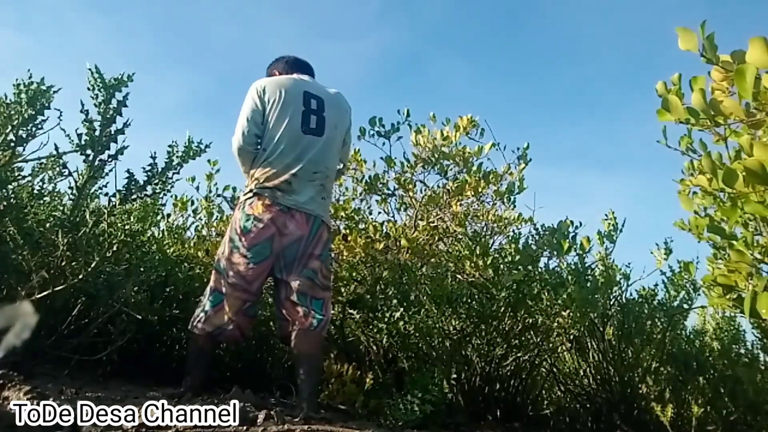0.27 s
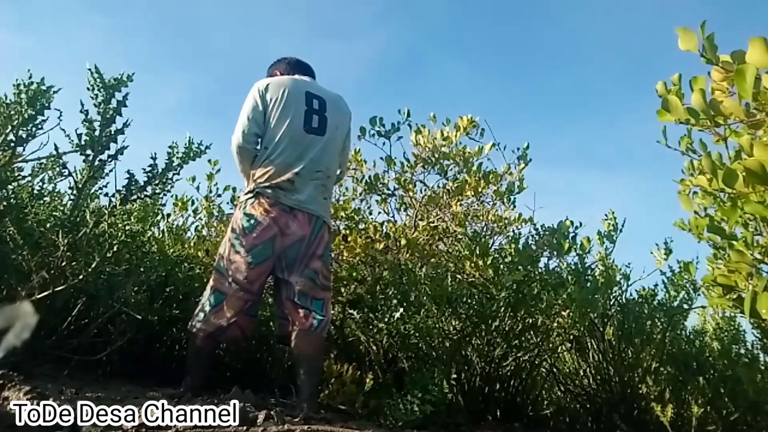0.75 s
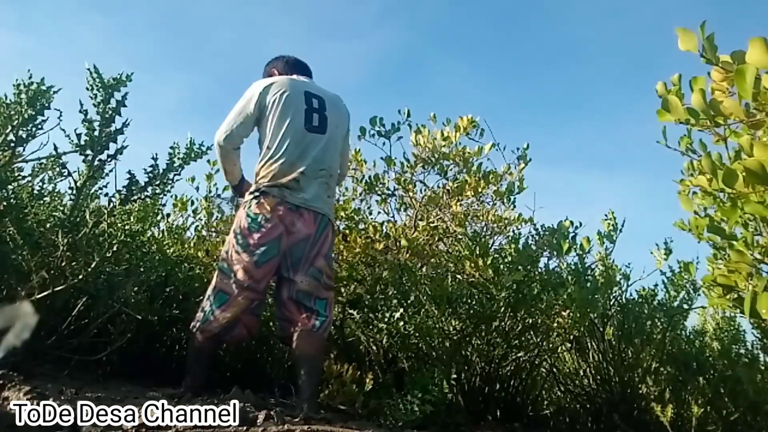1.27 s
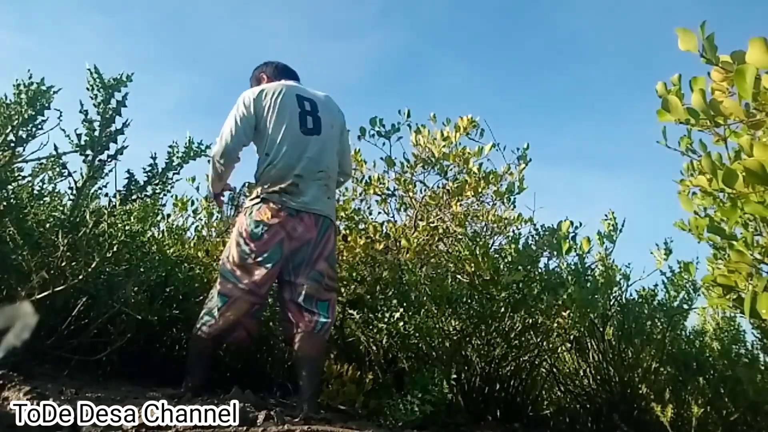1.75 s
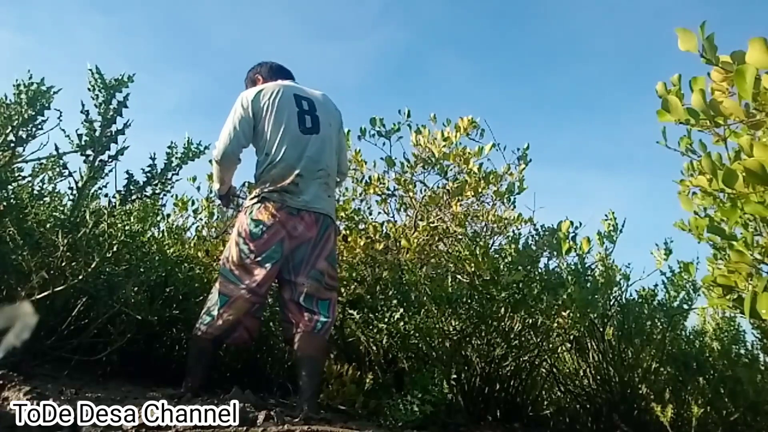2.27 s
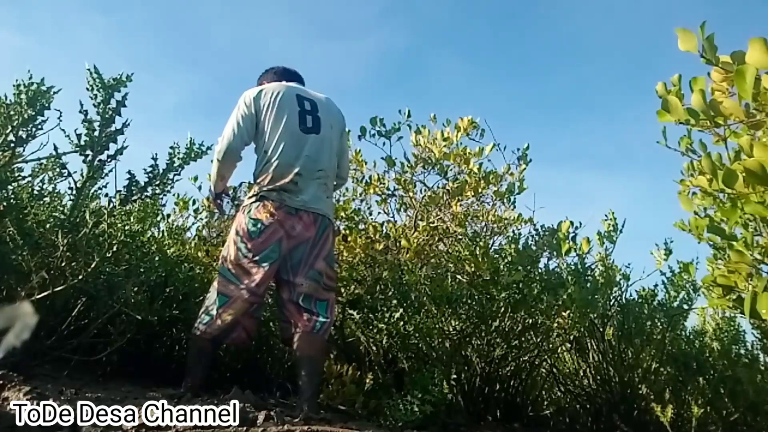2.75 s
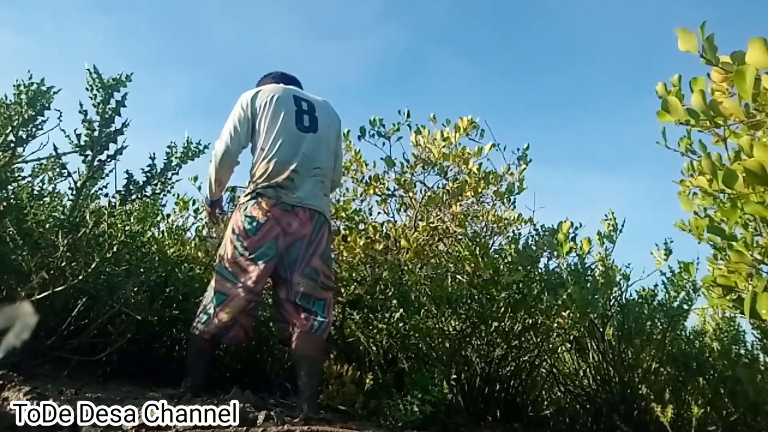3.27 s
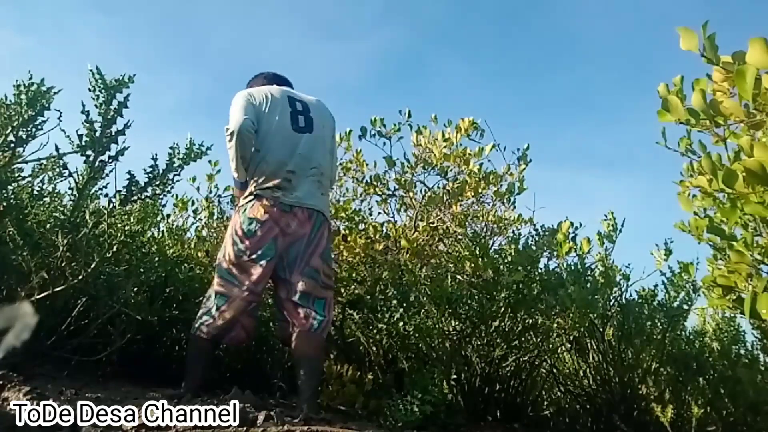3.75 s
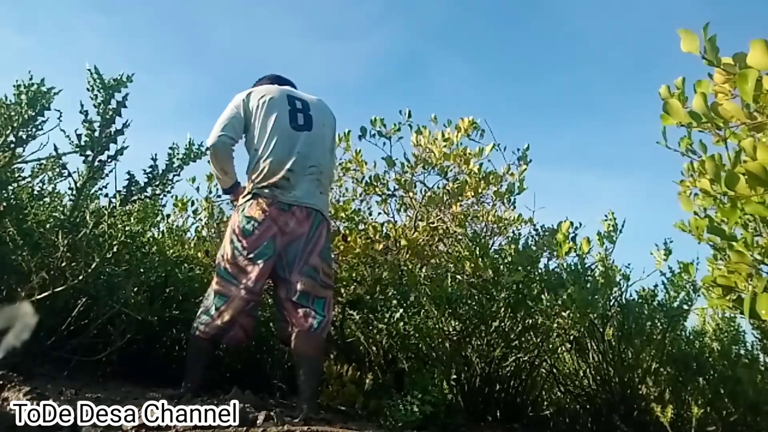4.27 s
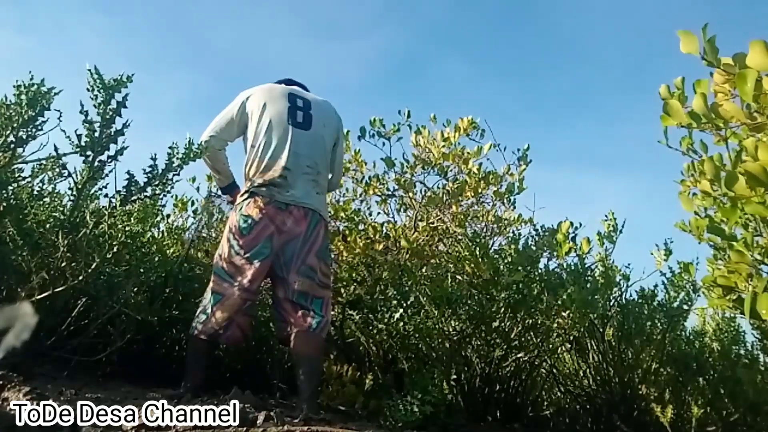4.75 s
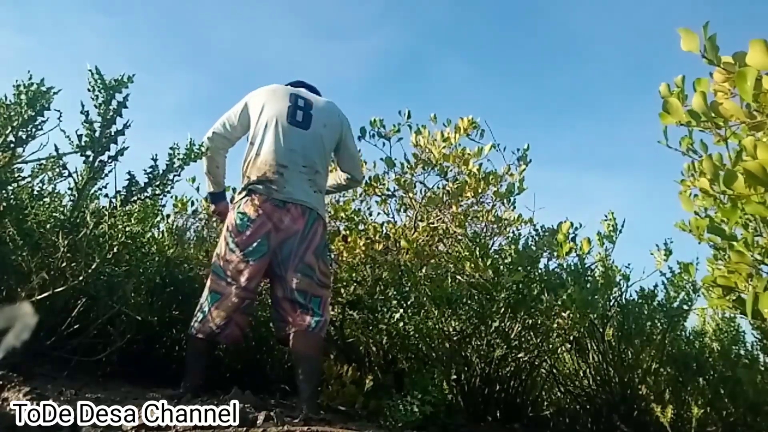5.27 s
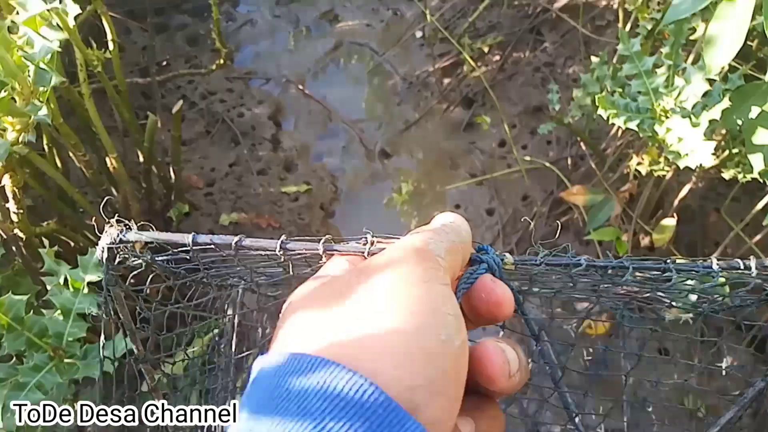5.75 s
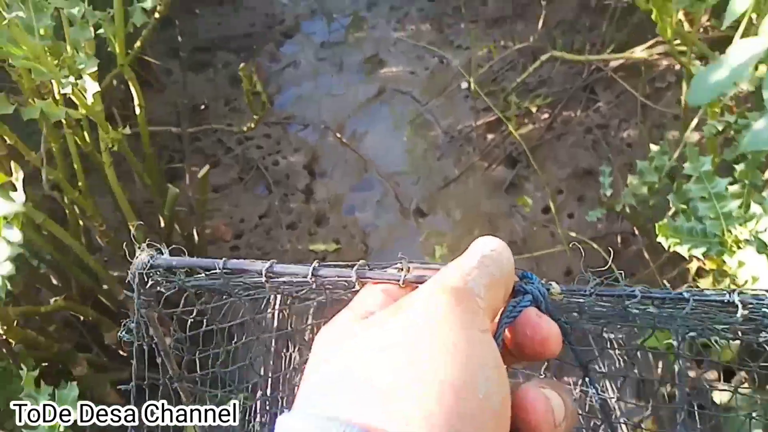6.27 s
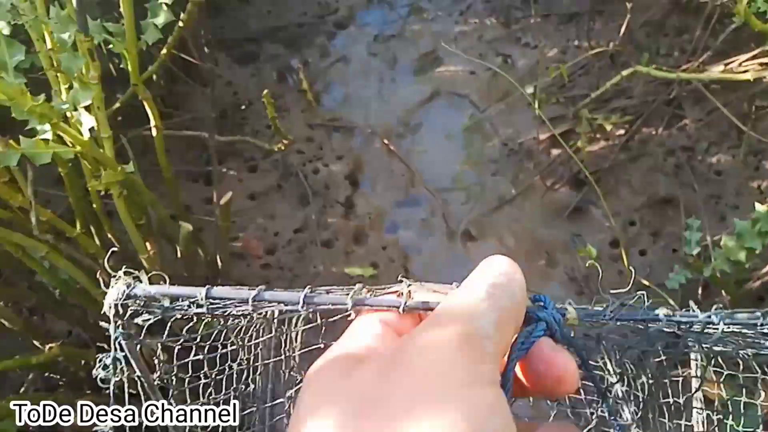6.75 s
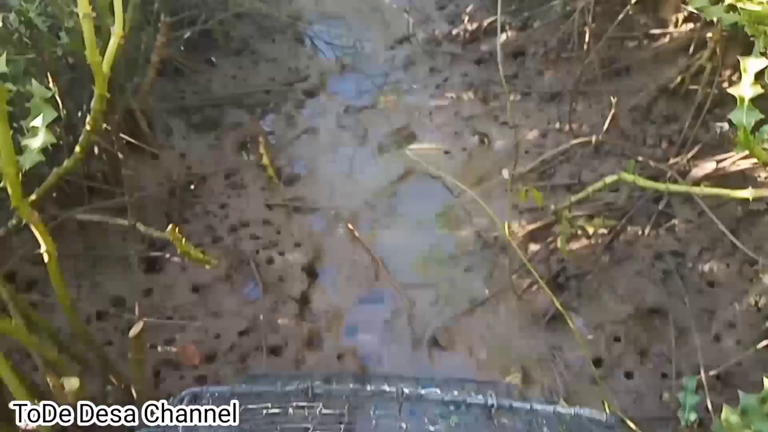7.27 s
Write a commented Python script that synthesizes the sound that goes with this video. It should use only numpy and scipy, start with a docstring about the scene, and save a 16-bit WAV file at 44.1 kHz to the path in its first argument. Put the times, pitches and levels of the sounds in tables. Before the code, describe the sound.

A high, throbbing cicada chorus drones outdoors throughout, with one nearer cicada pulsing in rapid phrases until about 5.8 seconds. Faint two-note bird calls repeat over soft hiss and a barely audible distant engine. Soft hollow knocks and dry taps of handled gear come in the first second, then around 1.6, 3 and 3.6 seconds. Clothing swishes briefly near 5.3 seconds. At 5.8 seconds everything cuts out for an instant and returns with a closer perspective, the cicadas still buzzing. From about 6.2 to 6.8 seconds comes the loudest event: a wire trap scrapes through leaves, its mesh rattling and ringing, its frame thudding and twigs snapping. A few more cracks and knocks follow around 7 seconds, with two short falling bird squeals. Light rustling and a chirp continue under the insects until about 7.6 seconds.

```python
"""Wire trap in a cicada thicket

Cicadas drone from buckling tymbals over a muddy thicket; a far engine throbs and birds chirp,
while a man nearby knocks and brushes his gear. After a short silence we are close to a wire trap
dragged through the leaves: the mesh scrapes and rings, the frame bumps and twigs snap."""
import sys
import numpy as np
from scipy import signal
from scipy.fft import rfft, irfft, next_fast_len
from scipy.io import wavfile
from scipy.ndimage import uniform_filter1d, map_coordinates

SR = 44100
rng = np.random.default_rng(int(sys.argv[2]) if len(sys.argv) > 2 else 0)


def log_audio(samples):
    """Write samples as a 16-bit WAV file to the path given in sys.argv[1]."""
    # one column per channel
    frames = np.atleast_2d(samples).T
    # limit to full scale, then quantise
    limited = np.clip(frames, -1, 1)
    pcm = np.round(limited * 32767).astype(np.int16)
    wavfile.write(sys.argv[1], SR, pcm)


N = 331191
GAP_START_S, GAP_END_S = 5.787, 5.827  # silence between the wide scene and the close one

# tone of scraping mesh (frequency [Hz], level [dB])
SCRAPE_TONE = [(760, -79), (1300, -41), (1460, -8), (1660, -2.5), (1790, -17), (1920, -14), (2030, -33),
               (2190, -2.5), (2970, 1.5), (3450, -6), (4030, -2), (4390, -5.5), (5020, -3), (6960, 0.5),
               (8400, -19), (10900, -81), (18500, -120)]
# tone of rustling leaves (frequency [Hz], level [dB])
LEAF_TONE = [(4710, -11), (8000, -8.5), (9570, -3.5), (11000, -4.5), (12600, -6), (13400, -22.5)]
# stereo image of airy sounds (frequency [Hz], left-right likeness [0-1])
AIR_IMAGE = [(100, 1), (400, 0.98), (1200, 0.68), (6000, 0.54)]
# stereo image of friction sounds (frequency [Hz], left-right likeness [0-1])
DRAG_IMAGE = [(3000, 1), (4500, 0.98), (7300, 0.5), (13000, 0.45)]


def amp(db):
    """Gain of a level in dB."""
    return 10 ** (np.asarray(db) / 20)


def unit(x):
    """x at rms 1."""
    return x / np.sqrt(np.mean(x ** 2) + 1e-20)


def along(points, hz):
    """Reads (frequency, value) points on a log axis."""
    freqs, values = np.transpose(points)
    return np.interp(np.log(hz + 1), np.log(freqs + 1), values)


def curves(rows, outside=None):
    """An automation curve for each column after the time."""
    times, *columns = np.transpose(rows)
    return np.array([np.interp(np.arange(N) / SR, times, c, outside, outside) for c in columns])


def wobble(rate):
    """A smooth random curve, rate knots a second."""
    return map_coordinates(rng.standard_normal(int(N * rate / SR) + 4), [np.arange(N) * rate / SR])


def filtered(x, response):
    """x through an EQ whose gain is a function of frequency."""
    size = next_fast_len(N + SR // 2)
    return irfft(rfft(x, size) * response(np.fft.rfftfreq(size, 1 / SR)), size)[..., :N]


def add(track, s, sound):
    """Mixes a short sound in at time s."""
    part = track[round(s * SR):][:len(sound)]
    part += sound[:len(part)]


def rush(tone, image, grain_db):
    """Stereo noise of rms 1, lumped into grains by a fast random gain."""
    pair = rng.standard_normal((2, N)) * amp(grain_db * (wobble(400) + wobble(45)))
    angle = lambda hz: np.arccos(np.clip(along(image, hz), -1, 1)) / 2
    mid, side = filtered(pair, lambda hz: amp(along(tone, hz)) * [np.cos(angle(hz)), np.sin(angle(hz))])
    return unit(np.array([mid + side, mid - side]))


def patchy(x, depth_db):
    """Random patches of gain in time and frequency, as when contact points keep changing; rms 1."""
    spectrum = signal.stft(x, nperseg=256)[2]
    field = rng.standard_normal(spectrum.shape[1:])
    field = uniform_filter1d(uniform_filter1d(field, 3, 0), 9, 1)
    return unit(signal.istft(spectrum * amp(depth_db * unit(field)), nperseg=256)[1][:, :N])


def scatter(x, t60):
    """Diffuse echoes from the foliage."""
    t = np.arange(SR // 4) / SR
    tail = rng.standard_normal(len(t)) * amp(-60 * t / t60)
    return signal.fftconvolve(x, tail / np.linalg.norm(tail))[:N]


def plucks(modes, count, t60):
    """Random short rings, each on one mode of the object, in runs that favour a mode; rms 1."""
    hz, width, db = np.transpose(modes)
    when, pick, detune, size = rng.random((count, 4)).T
    favoured = rng.random(N // 1500 + 1)[(when * N // 1500).astype(int)]
    mode = (np.where(pick < .4, favoured, pick / .6 % 1) * len(hz)).astype(int)
    t = np.arange(SR // 30) / SR
    pitch = hz[mode] + (width[mode] + 120) * (detune - .5)
    attack = 1 - np.exp(-t / .00015)
    decay = amp(db[mode, None] + 9 * size[:, None] ** 3 - 60 * t / t60)
    rings = attack * decay * np.sin(2 * np.pi * np.outer(pitch, t))
    samples = (when * N).astype(int)[:, None] + np.arange(len(t))
    return unit(np.bincount(samples.ravel(), rings.ravel())[:N])


def strokes(rows, rise_db_per_s, fall_db_per_s):
    """An envelope for each level column: every (time, hold, levels...) row rises, holds and falls."""
    t = np.arange(N) / SR
    rise = lambda s: amp(-rise_db_per_s * np.clip(s - t, 0, 1))
    fall = lambda s: amp(-fall_db_per_s * np.clip(t - s, 0, 1))
    return sum(np.outer(amp(db), rise(s) * fall(s + hold)) for s, hold, *db in rows)


def cicada_chorus():
    """Many cicadas blur into one band; in the wide scene it throbs with the nearest of them."""
    # swell of the chorus (time [s], level [dB])
    swell = [(0.0, -44.5), (0.81, -42.5), (1.4, -43.5), (1.99, -44), (2.42, -47), (2.93, -43.5),
             (4.54, -46.5), (4.98, -42.5), (5.37, -42), (5.75, -45), (5.96, -51), (6.09, -41),
             (6.55, -35.5), (6.76, -38), (7.17, -42.5), (7.51, -39.5)]
    # chorus tone in the wide scene (frequency [Hz], level [dB])
    wide_tone = [(3650, -69), (6200, -37), (6320, -37), (6420, -29.5), (6640, -7.5), (6740, -13),
                 (6850, -5), (6880, 5.5), (6920, 5), (7100, 12.5), (7420, 7), (7500, -23.5), (7600, -4),
                 (9880, -38.5), (16700, -120)]
    # chorus tone in the close scene (frequency [Hz], level [dB])
    close_tone = [(3530, -59), (6000, -23), (6930, -7), (7040, 10.5), (7400, 9.5), (7790, 2), (8020, -16),
                  (8280, -7.5), (8450, -29), (8600, -63), (11200, -40), (18900, -120)]
    # pace of the throb (time [s], beats so far [count])
    beats = [(.03, 0), (3.743, 43), (4.93, 57), (7.61, 88)]
    # voices that stand out (frequency [Hz], width [Hz], level [dB])
    singers = [(6890, 16, 1.5), (7165, 6.2, 0), (7140, 21, -4.5)]
    t = np.arange(N) / SR
    beat = np.interp(t, *np.transpose(beats))
    pause = np.cos(np.pi * (beat + .037)) ** 4  # the singer rests briefly in every beat
    throb = amp(-7.5 * (1 + .3 * wobble(3)) * pause + 2.5 * np.cos(2 * np.pi * 8 * beat))
    voices = lambda f: 1 + sum(amp(db) / (1 + (2 * (f - hz) / width) ** 2) for hz, width, db in singers)
    wide = unit(throb) * unit(filtered(rush(wide_tone, [(7000, 1.0)], grain_db=-.37), voices))
    close = rush(close_tone, [(7000, .97)], grain_db=.6)
    return amp(curves(swell)[0]) * np.where(t < GAP_START_S, wide, close)


def far_engine():
    """Firings throb through a low rumble, fainter in the close scene."""
    # tone of the rumble (frequency [Hz], level [dB])
    tone = [(12, -57.5), (20, -19), (27, -36), (48, -32.5), (61, -16), (73, -3.5), (102, 4.5), (135, -0.5),
            (232, -16), (330, -26), (430, -48), (730, -120)]
    t, firing_hz = np.arange(N) / SR, 20.3
    throb = amp(3.5 * np.cos(2 * np.pi * firing_hz * t + .5 * wobble(2)) + .8 * wobble(3))
    level_db = np.where(t < GAP_START_S, -65, -75.5)
    return amp(level_db) * unit(throb) * rush(tone, AIR_IMAGE, grain_db=-.55)


def air():
    """A soft bed of hiss, a little lower in the close scene."""
    # tone of the hiss (frequency [Hz], level [dB])
    tone = [(120, -35.5), (200, -5), (323, -8), (670, -10.5), (923, -14), (2340, -16.5), (3050, -17),
            (4320, -21.5), (5070, -14), (6130, -18.5), (6500, -2.5), (8450, -46), (14300, -120)]
    level_db = np.where(np.arange(N) / SR < GAP_START_S, -71.5, -74.5)
    return amp(level_db) * patchy(rush(tone, AIR_IMAGE, grain_db=0), 1.5)


def birds():
    """Gliding whistles; far high voices turn husky in the bushes, hoots and close calls stay clearer."""
    # two-note calls (time [s], level [dB])
    pairs = [(0.028, -64.5), (0.3135, -63.5), (0.5974, -68), (0.87, -58), (1.151, -54.5), (1.4254, -54.5),
             (1.711, -57), (1.999, -62), (2.2883, -63), (2.572, -55.5), (2.8441, -54), (3.1218, -54.5),
             (3.412, -60), (3.69, -66), (3.986, -70), (4.249, -74), (4.518, -64.5), (5.072, -60.5)]
    # notes of that call (delay [s], length [s], start pitch [Hz], end pitch [Hz], level [dB])
    pair_notes = [(0, .05, 3354, 3053, -7), (0.035, 0.036, 3146, 2810, -8)]
    # close falling squeals (time [s], level [dB])
    squeals = [(6.958, -37), (7.126, -37.5)]
    # parts of a squeal (delay [s], length [s], start pitch [Hz], end pitch [Hz], level [dB])
    slide = [(-.015, 0.027, 3350, 3330, -17), (0, 0.021, 3330, 2740, -4), (0.011, .045, 2750, 2730, -8.5),
             (0.035, 0.061, 2730, 2720, -17)]
    # single chirps and hoots (time [s], length [s], start pitch [Hz], end pitch [Hz], level [dB])
    chirps = [(0.103, 0.05, 1500, 1418, -67.5), (0.312, 0.057, 1456, 1437, -67),
              (0.386, 0.063, 1360, 1390, -69), (0.783, 0.051, 2770, 2690, -71),
              (1.044, 0.036, 2900, 2840, -64.5), (1.124, .05, 2560, 2670, -74),
              (1.193, 0.052, 2480, 2430, -70), (1.63, 0.054, 2860, 2680, -70),
              (1.901, 0.05, 2700, 2570, -67.5), (2.18, 0.044, 4170, 3700, -68),
              (2.453, 0.086, 4020, 3820, -78), (3.604, 0.071, 2880, 2795, -69),
              (3.624, 0.27, 1412, 1300, -74), (4.413, 0.039, 3600, 3590, -65), (4.595, 0.26, 572, 590, -61),
              (4.676, 0.065, 2620, 2440, -68), (5.044, 0.048, 593, 591, -69.5),
              (5.173, 0.09, 563, 520, -67), (5.591, 0.12, 2880, 3330, -77.5), (5.696, 0.039, 800, 783, -66),
              (5.959, 0.022, 2940, 2980, -53), (6, .03, 3200, 3510, -55.5), (6.025, 0.063, 3300, 3390, -58),
              (7.196, 0.17, 2720, 2760, -66), (7.126, 0.065, 4100, 4200, -60),
              (7.371, 0.029, 2440, 2230, -46.5)]
    far, close = np.zeros((2, N))
    waver, husk_db = .012 * wobble(110), 5.5 * wobble(220)
    keys = 1 + .011 * rng.standard_normal(len(pairs))
    notes = [(s + delay - .01, length, from_hz * key, to_hz * key, db + note_db)
             for (s, db), key in zip(pairs, keys)
             for delay, length, from_hz, to_hz, note_db in pair_notes]
    notes += [(s + delay, length, from_hz, to_hz, db + note_db)
              for s, db in squeals for delay, length, from_hz, to_hz, note_db in slide]
    for s, length, from_hz, to_hz, db in notes + chirps:
        rough = 1 if from_hz > 2000 and s < GAP_START_S else .45
        progress = np.arange(round(length * SR)) / (length * SR)
        span = slice(round(s * SR), round(s * SR) + len(progress))
        pitch = (from_hz + (to_hz - from_hz) * progress) * (1 + rough * waver[span])
        envelope = amp(db + rough * husk_db[span]) * np.sin(np.pi * progress) ** .52
        add(far if s < GAP_START_S else close, s, envelope * np.sin(2 * np.pi * np.cumsum(pitch) / SR))
    return amp(-3) * far + amp(-4.5) * scatter(far, .13) + close + amp(-10) * scatter(close, .1)


def near_cicada():
    """In each chirp, buckling ribs pulse the two tymbal modes; a phrase ends slower and fainter."""
    # song phrases; the lead-in tilts the balance of a chirp's pulses (start [s], tires [s], end [s],
    # level [dB], tired level [dB], lead-in [dB], tired lead-in [dB])
    phrases = [(.09, .09, .239, -39, -50.5, -5, -8.5), (.314, 2.034, 2.336, -43.5, -56, -4, -1.5),
               (2.5, 3.317, 3.639, -43, -51, -8.5, -3.5), (3.724, 5.067, 5.22, -41.5, -55.5, -1, -1),
               (5.337, 5.782, 5.782, -41.5, -44, -1.5, -0.5)]
    # rib buckles in a chirp, the last row the ringing between them
    # (delay [s], width [s], upper mode [dB], lower mode [dB], lead-in weight [factor])
    buckles = [(.014, .0015, -10, 2.5, -0.6), (0.022, 0.0015, -2.5, -10.5, 0.9),
               (.0275, .0013, -14.5, -2.5, -1.5), (.031, .0013, -2, -21.5, -0.2),
               (.036, 0.0014, -8, 4.5, 6), (.048, 0.001, -1, -7, -0.2), (.052, 0.00092, -5, -17, 0.13),
               (.055, 0.0014, -5, -12.5, 1.1), (0.039, 0.009, -13, -37, 0.5)]
    # tymbal resonance (frequency [Hz], level [dB])
    tymbal = [(7200, -36), (7500, 0.5), (7700, -6), (7900, -0.5), (8000, -13), (8300, -19.5), (8500, -63)]
    modes_hz, chirp_step_s, tired_step_s = (7822, 7655), .0745, .077
    sag_db_per_s, ease_s = 1, .03
    paced = lambda a, b, step, last: np.linspace(a, b, round((b - a) / step) + last, endpoint=last)
    starts, levels = [], []
    for start, tires, end, db, tired_db, lead, tired_lead in phrases:
        starts += [*paced(start, tires, chirp_step_s, False), *paced(tires, end, tired_step_s, True)]
        eased = tires + ease_s
        levels += [(start, db, lead), (tires, db - sag_db_per_s * (tires - start), tired_lead),
                   (eased, tired_db, tired_lead), (max(end, eased), tired_db, tired_lead)]
    level_db, lead_db = curves(levels)
    t, song = np.arange(N) / SR, np.zeros(N)
    upper, lower = [np.sin(2 * np.pi * (hz * t + np.cumsum(12 * wobble(30)) / SR)) for hz in modes_hz]
    pulse_t = np.arange(-SR // 30, SR // 30) / SR
    for delay, width, upper_db, lower_db, weight in buckles:
        gate, pulse = np.zeros(N), np.exp(-.5 * (pulse_t / width) ** 2)
        for s, (slip, size) in zip(starts, rng.standard_normal((len(starts), 2))):
            add(gate, s + delay + pulse_t[0] + .00033 * slip, amp(1.2 * size) * pulse)
        ring = amp(upper_db) * upper + amp(lower_db + 2.3 * lead_db) * lower
        song += amp(weight * lead_db) * gate * ring
    song = filtered(song, lambda hz: amp(along(tymbal, hz)))
    return amp(level_db) * unit(song + amp(-4) * scatter(song, .09)) * (t < GAP_START_S)


def knocks():
    """A hollow body thumps at its own pitch with a rough cluster of modes."""
    # knocks on the gear (time [s], level [dB], pitch [Hz], 60 dB decay [s])
    hits = [(.1, -59.5, 357, 0.13), (.134, -45.5, 624, 0.085), (0.333, -45, 622, 0.068),
            (0.544, -57, 495, 0.12), (.768, -45.5, 597, 0.11), (.8, -49.5, 469, 0.088),
            (.826, -43, 610, 0.1), (.83, -52, 427, 0.08), (1.549, -61, 400, 0.095),
            (1.602, -48, 593, 0.053), (2.112, -54, 868, 0.06), (2.59, -57.5, 533, 0.16),
            (2.62, -56.5, 625, 0.1), (2.81, -55, 363, 0.15), (2.82, -63, 747, 0.14),
            (3.046, -44.5, 567, 0.17), (3.079, -41.5, 423, 0.08), (3.6, -46, 440, 0.14),
            (3.635, -49.5, 605, 0.13), (4.415, -58, 605, 0.13), (4.469, -55.5, 520, 0.087),
            (6.149, -28, 320, 0.032), (6.84, -32, 730, 0.03), (6.955, -30, 659, 0.068),
            (7.104, -44, 136, 0.067), (7.165, -27, 802, 0.02)]
    track, t = np.zeros(N), np.arange(SR // 4) / SR
    for (s, db, hz, t60), spread in zip(hits, rng.standard_normal((len(hits), 3))):
        cluster = np.sin(2 * np.pi * hz * np.outer(1 + .09 * spread, t)).sum(0)
        ring = np.sin(2 * np.pi * hz * t) + .6 * cluster
        attack = 1 - np.exp(-(t / (.08 * t60)) ** 2)  # the longer the ring, the softer the blow
        add(track, s, attack * amp(db - 60 * t / t60) * ring)
    return track + amp(-8) * scatter(track, .11)


def taps():
    """Dry taps: short puffs of midrange noise."""
    # taps on the gear (time [s], level [dB])
    hits = [(0.544, -49.5), (1.38, -53), (2.678, -51), (4.121, -53), (5.686, -51)]
    centre_hz, width_hz, t60 = 1150, 900, .12
    puffs, t = np.zeros(N), np.arange(SR // 4) / SR
    for s, db in hits:
        add(puffs, s, amp(db - 60 * t / t60) * rng.standard_normal(len(t)))
    bandpass = lambda f: 1j * f * width_hz / (centre_hz ** 2 - f * f + 1j * f * width_hz)
    return filtered(puffs, lambda f: bandpass(f) ** 2)


def cloth():
    """Sleeves and netting brush past in short squeaky swishes."""
    # cloth strokes (time [s], hold [s], swish [dB], hiss [dB])
    brushes = [(.93, .018, -70.5, -100), (2.866, 0.0089, -75, -99), (4.02, 0.024, -72, -100),
               (4.135, 0.029, -64, -97), (4.235, 0.09, -63, -100), (4.425, 0.011, -63, -53.5),
               (5.11, .02, -69, -66), (5.23, .025, -48, -52.5), (5.275, 0.05, -52.5, -55),
               (5.37, 0.016, -63.5, -66), (5.895, 0.016, -50, -61), (5.985, 0.0065, -80, -58.5),
               (6.085, 0.0091, -80, -70), (6.99, 0.018, -41, -46), (7.17, 0.009, -78, -55.5),
               (7.245, .02, -81, -54.5)]
    # tone of a swish (frequency [Hz], level [dB])
    swish_tone = [(1470, -65), (2500, -15), (3110, -54.5), (3710, -14), (4120, -20.5), (5500, 7),
                  (6600, 8.5), (8580, -45), (14500, -120)]
    # squeak modes (frequency [Hz], width [Hz], level [dB])
    modes = [(3620, 220, -12), (4893, 480, 1.5), (5200, 250, -1), (6260, 350, -6)]
    swish, hiss = strokes(brushes, rise_db_per_s=800, fall_db_per_s=480)
    squeaks = plucks(modes, count=1500, t60=.045)
    rub = rush(swish_tone, AIR_IMAGE, grain_db=3.5) + amp(-5.5) * squeaks
    rustle = rush(LEAF_TONE, DRAG_IMAGE, grain_db=4)
    return swish * rub + hiss * filtered(rustle, lambda hz: 1 / (1 + (2500 / (hz + 1)) ** 2))


def trap():
    """The wire frame scrapes and bumps through leaves, which pluck its wires."""
    # the trap on the move (time [s], drag on the mesh [dB], stirred leaves [dB])
    drag = [(5.82, -80, -100), (5.84, -77.5, -71), (6.012, -67.5, -77), (6.12, -72, -91),
            (6.148, -61.5, -49.5), (6.234, -30.5, -39), (6.346, -26.5, -39.5), (6.374, -25.5, -30.5),
            (6.482, -25.5, -28.5), (6.62, -25, -30), (6.705, -26, -25.5), (6.732, -35, -32.5),
            (6.784, -46, -40), (6.826, -45.5, -54.5), (7.014, -50, -54.5), (7.1, -58.5, -65),
            (7.25, -73, -71), (7.334, -60, -54.5), (7.51, -54, -53)]
    # the frame hits stems and mud (time [s], hold [s], bump [dB], thud [dB], mesh shake [dB])
    jolts = [(6.148, .04, -45, -45, -55), (6.2, .05, -39, -42.5, -35.5), (6.272, 0.0089, -45, -33.5, -25.5),
             (6.517, 0.018, -57, -36.5, -27), (6.565, 0.045, -39, -33, -37),
             (6.615, 0.04, -37.5, -38.5, -22.5), (6.736, 0.024, -52, -29.5, -20),
             (6.835, 0.017, -80, -41, -54), (6.95, 0.055, -81, -47.5, -55), (7.103, 0.0091, -62, -62, -64),
             (7.165, 0.011, -82, -57, -62), (7.31, 0.21, -72, -69.5, -70)]
    # modes of the mesh (frequency [Hz], width [Hz], level [dB])
    wire_modes = [(1575, 61, -15.5), (1935, 210, -1.5), (3026, 410, 7), (3755, 170, 0), (5030, 200, 1),
                  (5560, 37, 2), (6796, 92, -0.5)]
    # deep bump of the frame (frequency [Hz], level [dB])
    bump_tone = [(40, -62), (70, -31), (120, -11), (160, -0.5), (230, 1.5), (300, -2.5), (380, -38)]
    # midrange thud of the frame (frequency [Hz], level [dB])
    thud_tone = [(160, -45), (280, 0), (587, 2), (677, 1.5), (1160, -7.5), (1280, -9), (1400, -8),
                 (1820, -18), (3080, -120)]
    split_hz = 4200  # the mesh scrapes below, fine wire and twigs rasp above
    drag_db, leaves_db = curves(drag, outside=-140)
    bump, thud, shake = strokes(jolts, rise_db_per_s=2100, fall_db_per_s=560)
    bump += amp(2 * drag_db)  # the deep bump swings wider than the drag
    thud += amp(drag_db - 15)
    scrape = np.hypot(amp(drag_db), shake)
    leaves = np.hypot(amp(leaves_db), amp(-12) * shake)
    rasp = amp(1.5) * np.sqrt(scrape * leaves)
    mesh = patchy(rush(SCRAPE_TONE, DRAG_IMAGE, grain_db=1.4), 2.2)
    mesh += amp(-5) * plucks(wire_modes, count=3000, t60=.045)
    coarse = unit(filtered(mesh, lambda hz: hz < split_hz))
    fine = unit(filtered(mesh, lambda hz: hz >= split_hz))
    frame = bump * rush(bump_tone, DRAG_IMAGE, grain_db=1.5)
    frame += thud * patchy(rush(thud_tone, DRAG_IMAGE, grain_db=3), 1.46)
    foliage = leaves * patchy(rush(LEAF_TONE, DRAG_IMAGE, grain_db=-1.5), 5.3)
    return frame + scrape * coarse + rasp * fine + foliage


def snaps():
    """Twigs and wire snap: a sharp crack with a brief, unsteady ring."""
    # single snaps (time [s], level [dB], pitch [Hz], treble [dB])
    hits = [(5.898, -48, 4700, -37), (6.0478, -40, 3250, -39), (6.1688, -25, 2680, -23),
            (6.2045, -17.5, 2610, -27), (6.22, -17, 2560, -34), (6.272, -12.5, 3190, -49),
            (6.322, -8.5, 3260, -45), (6.3906, -13.5, 2910, -14), (6.4411, -8.5, 3040, -25),
            (6.5206, -5, 2975, -35), (6.539, -10, 2920, -33), (6.739, -6, 5180, -24),
            (6.8534, -36.5, 2970, -1), (6.8877, -25, 3040, -27), (6.9037, -16, 3330, -35),
            (6.9205, -16.5, 2860, -29), (6.978, -25, 3410, -14), (6.9928, -33.5, 2780, -6),
            (7.0654, -30.5, 3310, -20), (7.3499, -37.5, 3320, -14), (7.433, -32.5, 4290, -15)]
    body, treble = np.zeros((2, N))
    t, crack_t60, ring_t60 = np.arange(SR // 20) / SR, .012, .038
    attack = 1 - np.exp(-t / .00056)
    for s, db, hz, treble_db in hits:
        crack = amp(db - 60 * t / crack_t60) * rng.standard_normal(len(t))
        phase = 2 * np.pi * hz * t + np.cumsum(rng.normal(0, .085, len(t)))
        ring = attack * amp(db - 6 - 60 * t / ring_t60) * np.sin(phase)
        add(body, s, amp(.58 * treble_db + 9) * crack + ring)
        add(treble, s, amp(treble_db + 11) * crack)
    body = filtered(body, lambda hz: amp(.24 * along(SCRAPE_TONE, hz)))
    return body + filtered(treble, lambda hz: amp(along(LEAF_TONE, hz)))


def scene():
    """The mix: a steep low-pass on cicadas, engine and hiss; a low cut on knocks, taps, trap and snaps."""
    low_pass_hz, low_cut_hz = 8330, 65
    bed = near_cicada() + cicada_chorus() + far_engine() + air()
    bed = filtered(bed, lambda hz: np.clip((low_pass_hz - hz) / 80, 0, 1))
    handled = filtered(knocks() + taps() + trap() + snaps(),
                       lambda hz: 1 / (1 + (low_cut_hz / (hz + 1)) ** 4))
    return bed + birds() + cloth() + handled


def record(dry):
    """A short mute parts the two scenes, and a steep low-pass trims the highest treble."""
    t, top_hz = np.arange(N) / SR, 13350
    mute = np.interp(t, [GAP_START_S - .001, GAP_START_S, GAP_END_S, GAP_END_S + .029], [1, 0, 0, 1])
    return filtered(dry * mute, lambda hz: np.clip((top_hz - hz) / 200, 0, 1))


dry = scene()
out = record(dry)
log_audio(out)
```